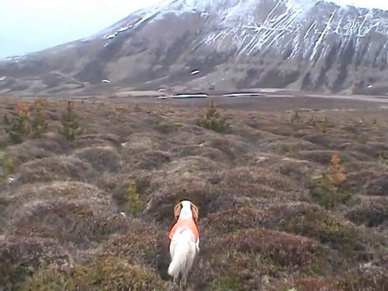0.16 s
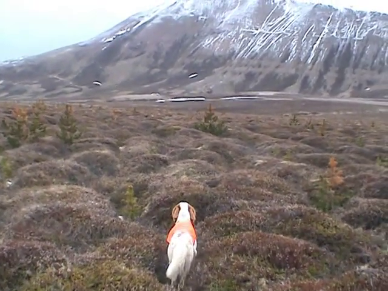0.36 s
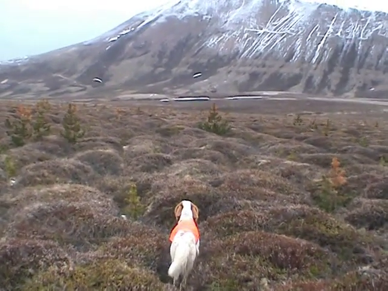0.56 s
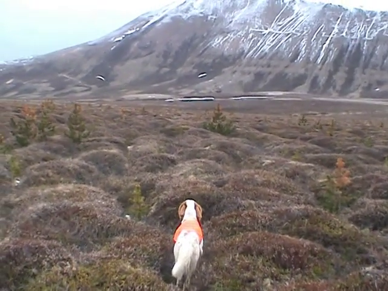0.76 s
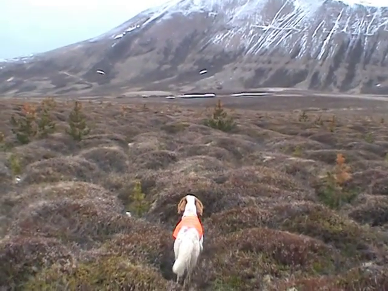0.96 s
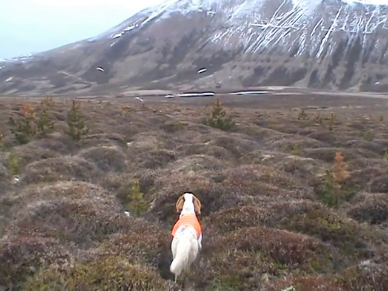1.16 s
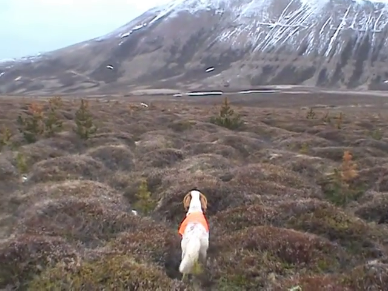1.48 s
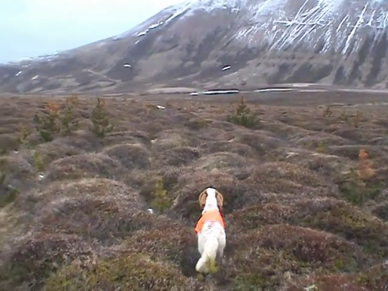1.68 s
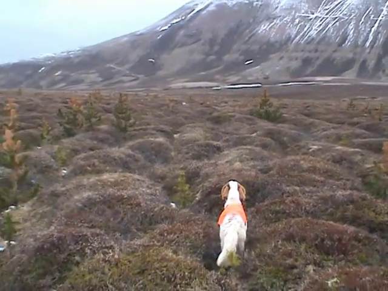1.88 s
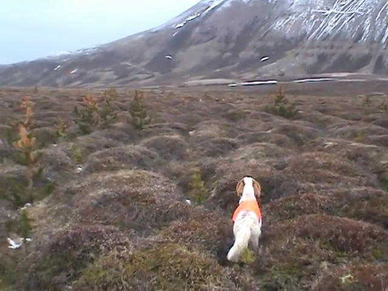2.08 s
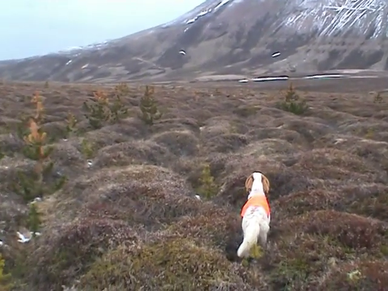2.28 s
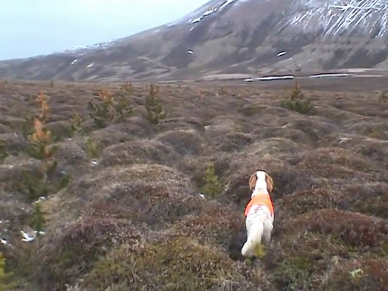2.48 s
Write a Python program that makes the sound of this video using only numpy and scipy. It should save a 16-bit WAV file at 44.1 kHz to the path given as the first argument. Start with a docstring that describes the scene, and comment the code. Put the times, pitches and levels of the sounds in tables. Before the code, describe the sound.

Gusty wind strikes a handheld camera's stereo microphone on open heath: a weak gust with thumps, a lull, then a stronger rushing gust; a distant bird clicks twice early and rattles dryly at the end.

```python
"""Open heath, the two close capsules of a camcorder microphone in gusty wind: weak gust, lull, strong gust.
The wind is coloured noise that follows a gust curve: rumble, rush, hiss, and a fizz of the fastest air.
Single eddies thump the capsules: short pressure swings, each with a puff of hiss.
A distant bird gives two dry clicks early and a rattle of eight late, each a tick with rings dying behind it.
Close by, the tape drive buzzes and whines faintly, noise pulses and thin tones, over steady airy hiss."""
import sys
import numpy as np
from scipy import signal
from scipy.fft import rfft, irfft
from scipy.io import wavfile

SR = 44100
rng = np.random.default_rng(int(sys.argv[2]) if len(sys.argv) > 2 else 0)


def inscribe(sig):
    """Save sig as 16-bit PCM at rate SR to the path in sys.argv[1].

    A 1-D sig is mono; a 2-D sig holds one channel per row.
    Samples are clipped to [-1, 1] before scaling.
    """
    pcm = np.round(np.clip(np.atleast_2d(sig).T, -1, 1) * 32767)
    wavfile.write(sys.argv[1], SR, pcm.astype(np.int16))


N = 115983


def undb(db):
    """Decibels to gain."""
    return 10 ** (np.asarray(db) / 20)


def unit(x):
    """Scale to rms 1, over both channels together."""
    return x / np.sqrt(np.mean(x ** 2))


def pan(db):
    """Left and right gains for a level difference, left minus right."""
    return undb(np.array([[db], [-db]]).reshape(2, -1) / 2)


def over_hz(table, column=1):
    """One column of a table, read at every frequency on a log axis."""
    rows = np.array(table, float)
    hz = np.maximum(np.fft.rfftfreq(N, 1 / SR), 1)
    return np.interp(np.log(hz), np.log(rows[:, 0]), rows[:, column])


def colour(x, table):
    """Shape the spectrum of a signal by a table, at rms 1."""
    return unit(irfft(rfft(x) * undb(over_hz(table)), N))


def walk(rate_hz):
    """Smooth chance with spread 1, strongest around the given rate."""
    hz = np.fft.rfftfreq(N, 1 / SR)
    weight = hz / rate_hz * np.exp(-hz / rate_hz)
    return unit(irfft(rfft(rng.standard_normal(N)) * weight, N))


# How wind reaches the two close capsules, before each layer's own offsets.
# Each row: frequency in Hz, likeness 0-1, lag of the left in radians, left minus right in dB.
CAPSULES = [(35, 0.7, 5, -1), (86, 0.65, 6.5, -4.5), (148, 1, 2.0, -8), (265, 0.68, 1.15, -3),
            (417, 0.97, 1.0, -7.5), (840, 0.59, 0.64, -5.5), (1300, 0.32, -0.55, -4),
            (2300, 0.49, -1.2, -1), (4500, 0.5, -0.5, 0), (12000, 1, 1, 5)]


def turbulence(table, lag_rad, pan_db, likeness):
    """Pressure noise on two close capsules: partly shared, shifted in phase and unequal in level."""
    shared, own_left, own_right = rfft(rng.standard_normal((3, N)))
    like = np.clip(likeness * over_hz(CAPSULES, column=1), 0, 1)
    lag = over_hz(CAPSULES, column=2) + lag_rad
    left = np.sqrt(like) * shared * np.exp(-1j * lag) + np.sqrt(1 - like) * own_left
    right = np.sqrt(like) * shared + np.sqrt(1 - like) * own_right
    balance = pan(over_hz(CAPSULES, column=3) + pan_db)
    return colour(irfft(np.array([left, right]) * balance, N), table)


# The gusts over the heath, before the trims below and the flutter.
# Each row: time in seconds, level of the rush in dB, of the bass in dB, of the treble in dB.
GUST = [(0, -37.5, -46.5, -61), (.03, -43, -41, -60.5), (.09, -37, -37, -54), (.17, -34.5, -34.5, -52.5),
        (.3, -37.5, -33.5, -56), (.38, -41.5, -39.5, -61), (.49, -40.5, -38, -62), (.56, -46.5, -47.5, -61),
        (.62, -44.5, -36.5, -63), (.7, -48, -50.5, -62), (.8, -44, -39.5, -60.5),
        (.96, -41.5, -39.5, -59.5), (1.0, -34.5, -33.5, -52), (1.12, -29, -31, -44.5), (1.2, -27, -33, -42),
        (1.27, -28, -31.5, -41.5), (1.34, -27, -29.5, -42), (1.42, -31.5, -34.5, -45.5),
        (1.6, -31.5, -33, -45.5), (1.82, -32, -36, -47), (1.92, -31, -34.5, -46), (2.05, -35, -33, -51.5),
        (2.11, -31.5, -26.5, -49.5), (2.132, -30.5, -33, -49), (2.155, -37.5, -31, -50),
        (2.195, -33, -30, -52.5), (2.225, -29.5, -30.5, -44), (2.28, -31, -33, -45.5),
        (2.37, -33.5, -37, -51.5), (2.47, -29, -31, -47), (2.535, -31.5, -29, -50), (2.6, -38.5, -43, -57),
        (2.63, -36, -41, -60)]
# Relative colours of rumble, rush, hiss and fizz. Each row: frequency in Hz, density in dB per Hz.
RUMBLE_COLOUR = [(20, -46), (40, -5.5), (75, -4.5), (130, 3.5), (220, -1), (320, -4.5), (500, -16.5),
                 (1000, -50), (6000, -95)]
RUSH_COLOUR = [(120, -17), (220, -2), (330, -2), (520, -0.5), (800, -3.5), (1050, -8), (1500, -18),
               (2500, -34), (6000, -100), (14000, -90)]
HISS_COLOUR = [(600, -26), (1200, 3), (1600, -2.5), (2100, -0.5), (2700, -7.5), (3600, -12.5),
               (5000, -23.5), (7500, -31.5), (10000, -44.5), (12500, -50), (16000, -44)]
FIZZ_COLOUR = [(1500, -28), (3200, 4.5), (5000, -4), (7500, -9.5), (10000, -18), (12500, -32), (16000, -36)]
# The wind shifts from side to side. Each row: time in seconds, added left minus right in dB.
SWAY = [(0, -1), (.3, -1.5), (.7, 0), (1.03, -2), (1.3, -1), (1.65, -1.5), (1.95, -2), (2.12, -2),
        (2.3, -2), (2.55, -1.5)]
RUMBLE_TRIM_DB, RUSH_TRIM_DB, HISS_TRIM_DB = 5, 1, 3
# fizz: level when the treble curve stands at the crest, and dB gained per dB of treble
FIZZ_DB, CREST_DB, FIZZ_GROWTH = -51, -42.5, 2.05


def wind(t):
    """Rumble, rush, hiss and steeper fizz follow the gust; they flutter together, each rough on its own."""
    when, rush_db, bass_db, treble_db = np.array(GUST).T
    flutter = walk(19)

    def layer(noise, curve_db, flutter_db, rough_db, rough_hz):
        """Noise under the gust curve, with shared flutter and its own roughness."""
        unrest = unit(undb(flutter_db * flutter + rough_db * walk(rough_hz)))
        return noise * unrest * undb(np.interp(t, when, curve_db))

    rumble = layer(turbulence(RUMBLE_COLOUR, lag_rad=0.27, pan_db=2.65, likeness=1.006),
                   bass_db + RUMBLE_TRIM_DB, flutter_db=1.16, rough_db=-0.2, rough_hz=50)
    rush = layer(turbulence(RUSH_COLOUR, lag_rad=-0.044, pan_db=2.86, likeness=1.0),
                 rush_db + RUSH_TRIM_DB, flutter_db=0.46, rough_db=1.06, rough_hz=94)
    hiss = layer(turbulence(HISS_COLOUR, lag_rad=.05, pan_db=1.5, likeness=1.15),
                 treble_db + HISS_TRIM_DB, flutter_db=0.3, rough_db=0.94, rough_hz=150)
    fizz_db = FIZZ_DB + FIZZ_GROWTH * (treble_db - CREST_DB)
    fizz = layer(turbulence(FIZZ_COLOUR, lag_rad=.05, pan_db=-6.5, likeness=.95),
                 fizz_db, flutter_db=1.4, rough_db=-0.5, rough_hz=200)
    sway_db = np.interp(t, *np.array(SWAY).T)
    return (rumble + rush + hiss + fizz) * pan(sway_db)


# Relative colour of the buzz beside the microphone. Each row: frequency in Hz, density in dB per Hz.
BUZZ_COLOUR = [(2500, -15), (4200, -5.5), (5600, 4.5), (6800, 0.5), (8500, -10), (10000, -6), (12000, -15),
               (16000, -37)]
# Thin tones of the motor. Each row: frequency in Hz, rms level in dB before the pan.
WHINE = [(5744, -78), (5954, -78), (6848, -74.5), (9561, -82), (11100, -91)]
HEAD_HZ, BUZZ_REPEAT_HZ = 300, 50
# buzz level before the pan, how far it sinks between ticks (0-1), repeating share of its power (0-1)
BUZZ_DB, BUZZ_DEPTH, BUZZ_REPEAT_SHARE = -64, 0.66, 0.62
DRIVE_PAN_DB = -9


def tape_drive(t):
    """The spinning heads tick against the tape in a partly repeating pattern; the motor adds thin tones."""
    pattern = rng.standard_normal((3, int(SR / BUZZ_REPEAT_HZ)))
    repeating = pattern[:, np.arange(N) % pattern.shape[1]]
    fresh = rng.standard_normal((3, N))
    scrape = np.sqrt(BUZZ_REPEAT_SHARE) * repeating + np.sqrt(1 - BUZZ_REPEAT_SHARE) * fresh
    tick = np.exp(-(t * HEAD_HZ % 1) / 0.086)  # decay as a fraction of the tick period
    contact = 1 - BUZZ_DEPTH * (1 - tick)
    # the third noise is common to both channels
    buzz = undb(BUZZ_DB) * colour((scrape[:2] + scrape[2]) * contact, BUZZ_COLOUR)
    whine = np.zeros(N)
    for hz, db in WHINE:
        phase_wander = 0.32 * walk(3.7)  # radians
        whine += np.sqrt(2) * undb(db) * np.sin(2 * np.pi * hz * t + phase_wander)
    return (buzz + whine) * pan(DRIVE_PAN_DB)


# Steady air over the heath.
# Each row: frequency in Hz, relative density in dB per Hz, likeness of the channels 0-1.
AIR = [(40, 2, 1), (305, -9, 0.84), (800, 4, 0.3), (1500, -29, 0.4), (2200, -18, 0.45), (4000, -15.5, 0),
       (7700, -19.5, 0.2), (12000, -35, 0.1), (16000, -35, .4)]
AIR_DB = -53


def air():
    """Smooth distant hiss, alike in both channels in the lows and wide in the treble."""
    noise = rfft(rng.standard_normal((3, N)))
    like = np.clip(over_hz(AIR, column=2), 0, 1)
    stereo = np.sqrt(1 - like) * noise[:2] + np.sqrt(like) * noise[2]
    return undb(AIR_DB) * colour(irfft(stereo, N), AIR)


# Clicks of the distant bird. Each row: start in seconds, level in dB that its rings are set against.
CLICKS = [(.0215, -35.5), (.0615, -36.5), (2.4605, -33.5), (2.4825, -28.5), (2.5045, -28.5), (2.527, -27.5),
          (2.5497, -31.5), (2.5738, -32), (2.6003, -30), (2.6285, -30)]
# What each click rings with.
# Each row: starting pitch in Hz before detuning, rise in Hz per second, relative level in dB, decay in seconds.
BIRD_MODES = [(2410, 0, 7, 0.00062), (2070, 0, -8.5, 0.0044), (2680, 90000, -9.5, .0024)]
CLICK_ATTACK_S, CLICK_LENGTH_S, CLICK_PAN_DB = 0.00097, .05, 3.5


def bird(t):
    """Each click is a sharp tick whose upper ring slides upward as it dies."""
    out = np.zeros(N)
    detunes = 0.013 * rng.standard_normal((len(CLICKS), len(BIRD_MODES)))
    for (when, db), click_detunes in zip(CLICKS, detunes):
        age = np.clip(t - when, 0, CLICK_LENGTH_S)
        onset = np.minimum(age / CLICK_ATTACK_S, 1) * (t - when < CLICK_LENGTH_S)
        for (hz, rise, mode_db, decay), detune in zip(BIRD_MODES, click_detunes):
            cycles = (hz * (1 + detune) + rise * age / 2) * age
            out += undb(db + mode_db) * onset * np.exp(-age / decay) * np.sin(2 * np.pi * cycles)
    return out * pan(CLICK_PAN_DB)


# Single eddies striking the capsules.
# Each row: centre in seconds, swing level in dB before the pan, pitch in Hz, left minus right in dB,
# lag of the left in radians, level of the puff of hiss in dB.
THUMPS = [(.2724, -7, 275, 1, 2.9, -52), (.312, -19, 240, -4, 2.2, -60),
          (.4115, -16.5, 170, -1.5, 2.2, -56), (.485, -22, 180, -3, 2.0, -55),
          (.526, -25, 180, -1, 2.1, -64), (.612, -26, 130, -1, 1.9, -64), (.805, -26, 130, 0, 2.0, -60),
          (.987, -16, 210, -3, 2.2, -58), (.9933, -14, 380, -8, 1.3, -48),
          (1.0203, -14, 170, -10, 2.0, -46), (1.19, -17, 100, -4, 1.8, -42),
          (1.604, -18, 250, -6, 1.2, -43), (2.0853, -13, 260, 1, 2.1, -47),
          (2.1297, -10, 220, -3, 2.2, -38), (2.244, -17, 210, -2, 1.8, -52),
          (2.418, -14, 180, -3, 2.4, -52), (2.532, -16, 260, -6, 1.8, -52)]
# Relative colour of the puffs at the capsules. Each row: frequency in Hz, density in dB per Hz.
PUFF_COLOUR = [(200, -3), (700, 11.5), (1500, -2), (3000, 0), (4800, -12.5), (7000, -22), (12000, -40),
               (16000, -48)]
THUMP_CYCLES, PUFF_S = .6, 0.0085  # widths of the swing in cycles and of the puff in seconds


def thumps(t):
    """Each eddy is a pressure swing of a cycle or two, later on the left, with a short puff of hiss."""
    out = np.zeros((2, N))
    hiss = turbulence(PUFF_COLOUR, lag_rad=0, pan_db=1, likeness=1)
    for when, db, hz, pan_db, lag, puff_db in THUMPS:
        cycles = (t - when) * hz
        swing = np.cos(2 * np.pi * cycles - np.array([[lag], [0]]))
        envelope = 1 / (1 + (cycles / THUMP_CYCLES) ** 2 / 2) ** 2
        out += undb(db) * pan(pan_db) * swing * envelope
        out += undb(puff_db) * hiss * np.exp(-((t - when) / PUFF_S) ** 2)
    return out


def scene():
    """Wind and thumps over the bird, the tape drive and the steady air."""
    t = np.arange(N) / SR
    return wind(t) + tape_drive(t) + air() + bird(t) + thumps(t)


def record(dry):
    """The recorder cuts the top with a steep low-pass at 15650 Hz."""
    low_pass = signal.ellip(10, .1, 80, 15650, fs=SR, output="sos")  # ripple and stopband in dB
    return signal.sosfilt(low_pass, dry)


dry = scene()
out = record(dry)
inscribe(out)
```